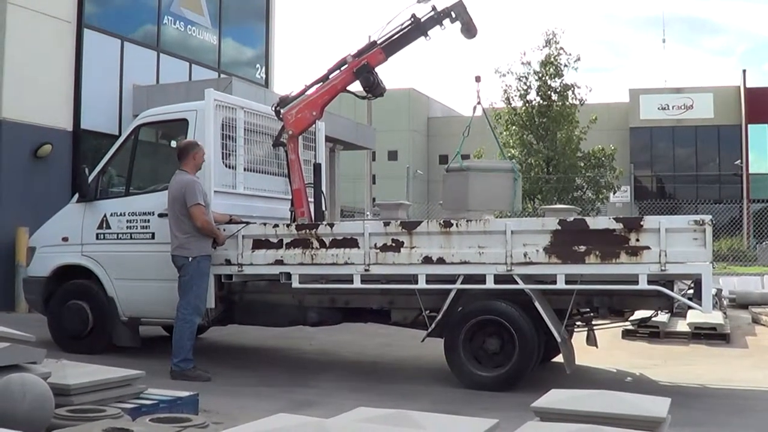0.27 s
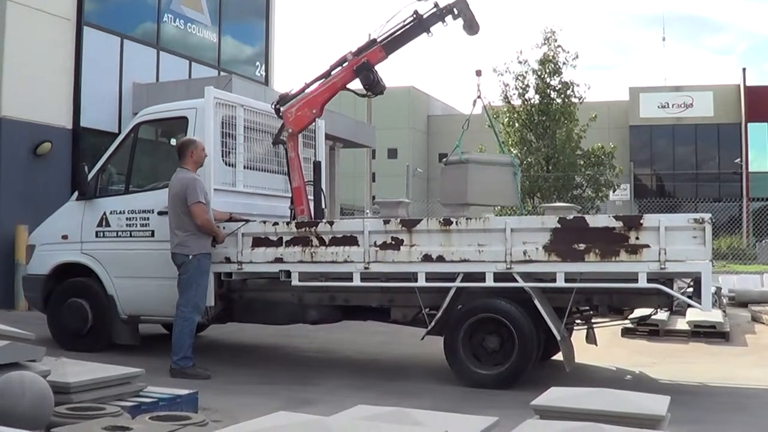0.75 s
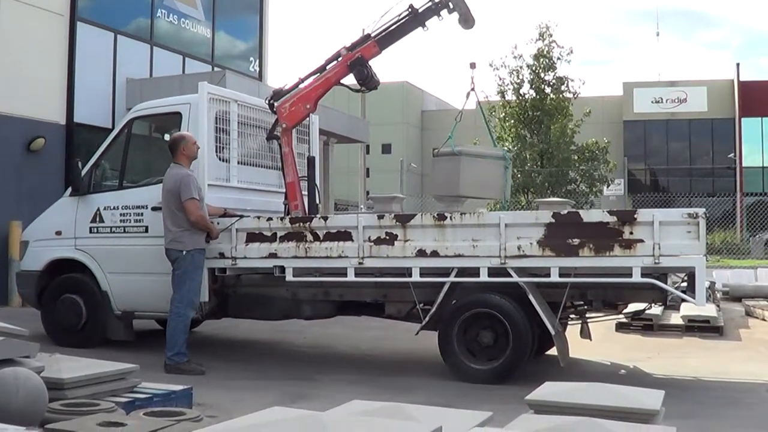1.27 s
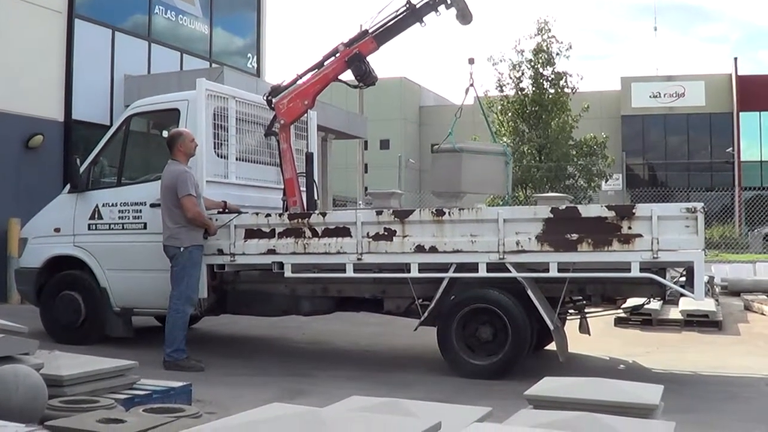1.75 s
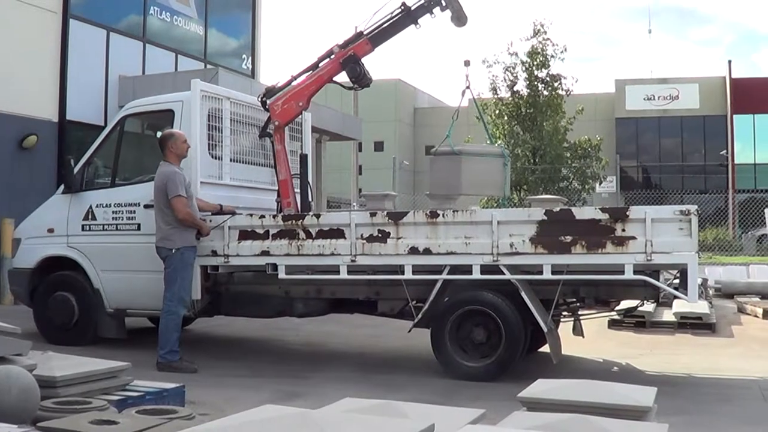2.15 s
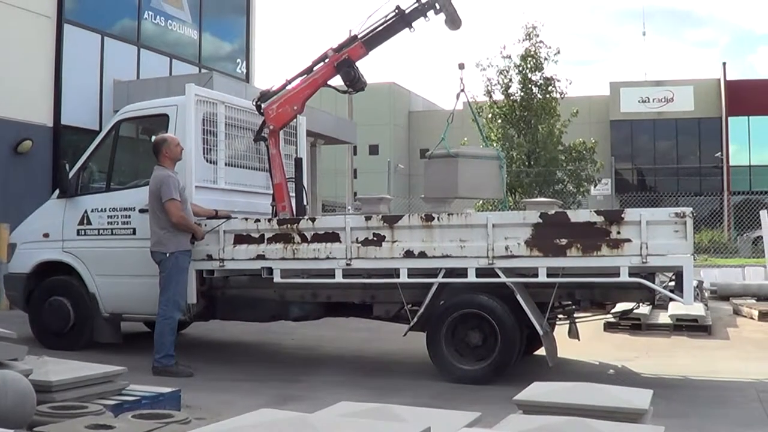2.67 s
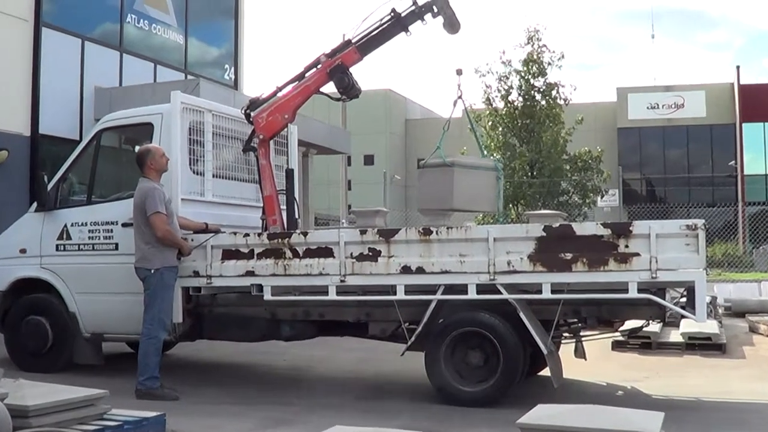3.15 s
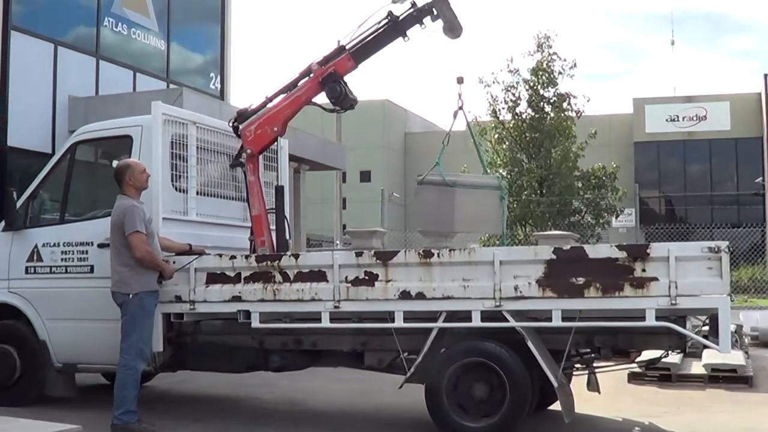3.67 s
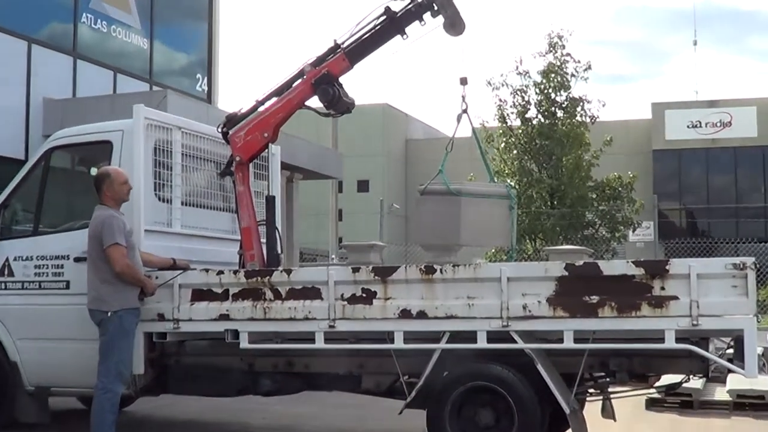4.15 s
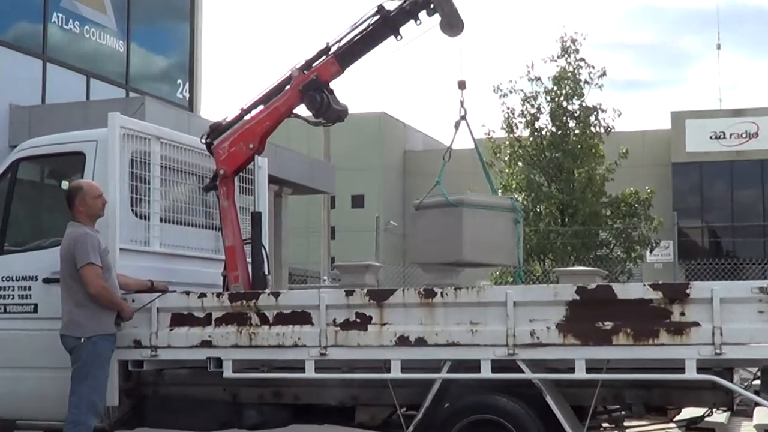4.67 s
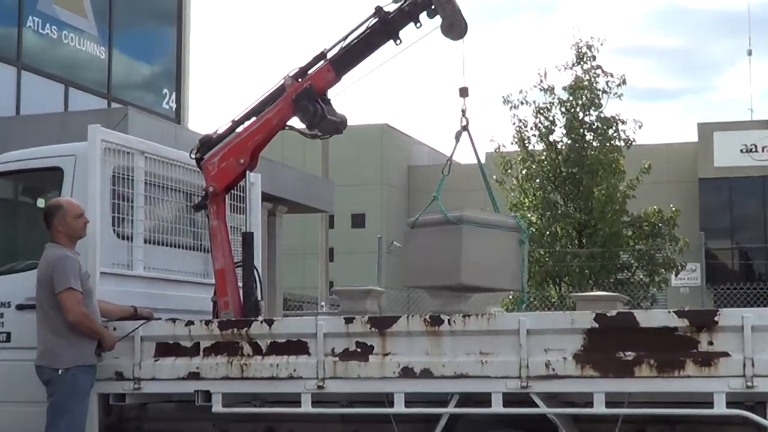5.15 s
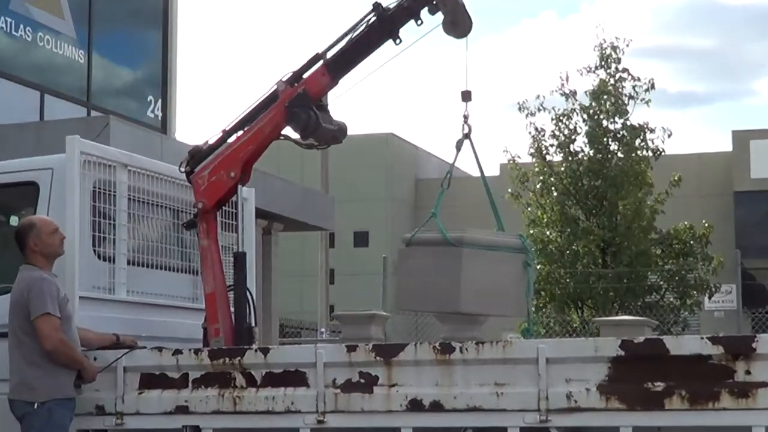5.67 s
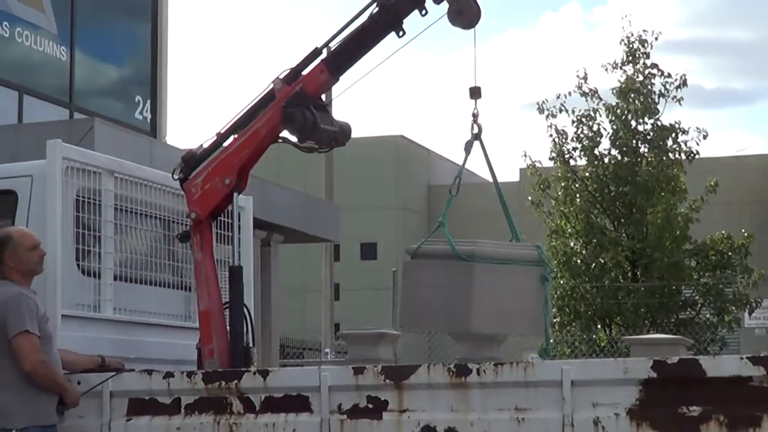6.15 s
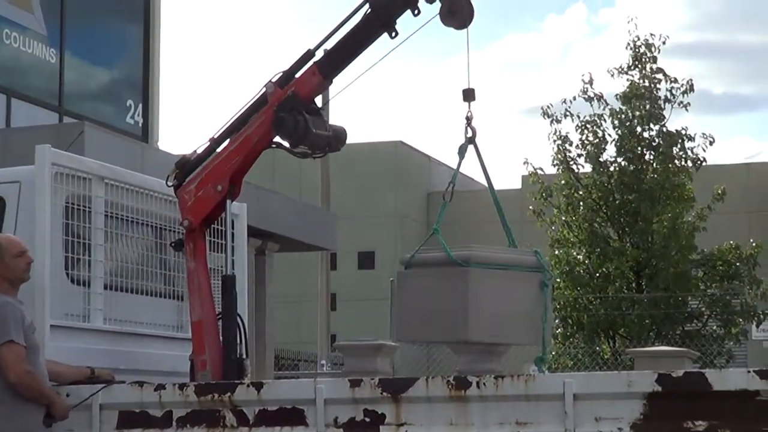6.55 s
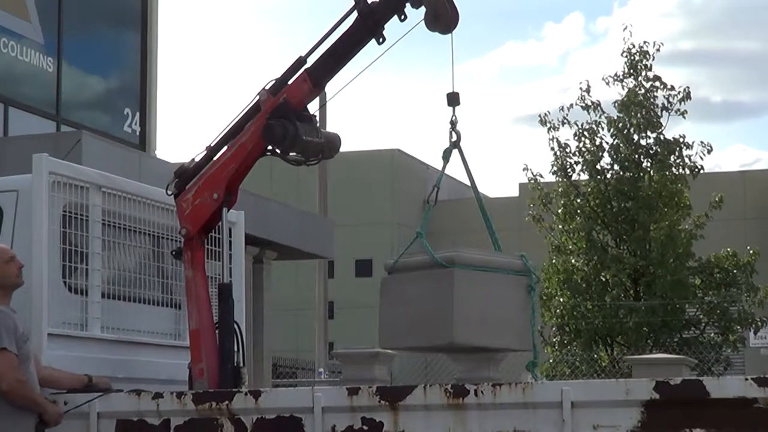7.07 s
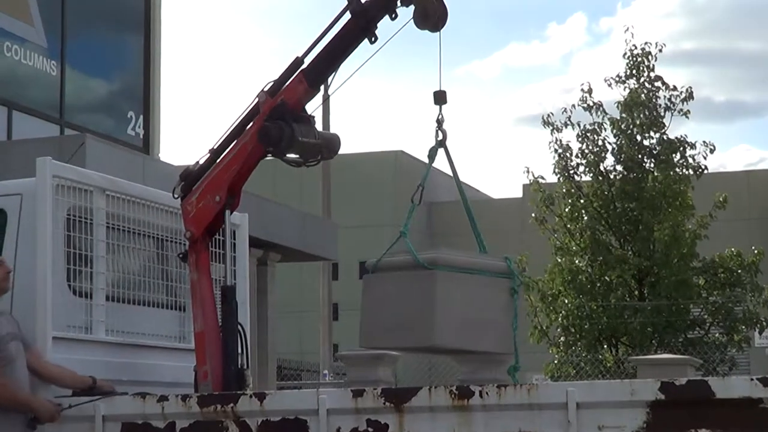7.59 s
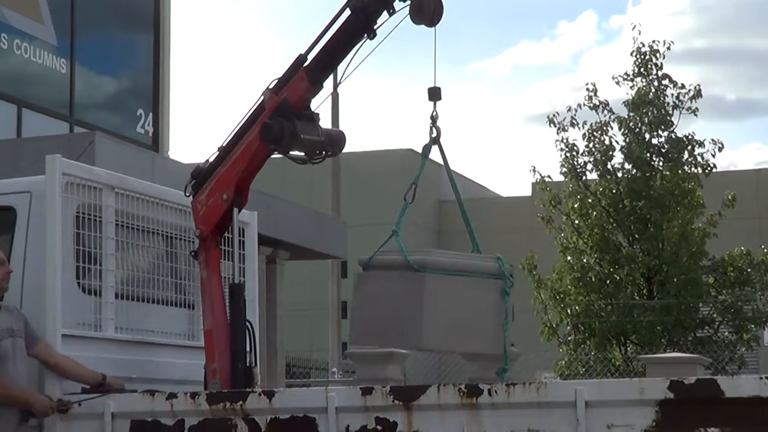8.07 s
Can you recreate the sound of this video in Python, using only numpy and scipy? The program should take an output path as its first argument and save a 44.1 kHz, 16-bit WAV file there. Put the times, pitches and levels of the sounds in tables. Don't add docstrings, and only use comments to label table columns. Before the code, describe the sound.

A few metres away in an open yard, a small truck crane's electric motor and gear pump whine steadily with a buzzy rasp. Wind thumps the camera's stereo microphones. About 1.6 seconds in, a metallic click cuts the motor and it coasts down; another clack restarts it, racing high. From three seconds it drops in pitch and settles into a stronger, rougher whine with rushing oil and humming hoses as the wind eases.

```python
import sys
import numpy as np
from scipy import signal
from scipy.fft import rfft, irfft, next_fast_len
from scipy.io import wavfile
from scipy.ndimage import uniform_filter1d

SR = 44100
rng = np.random.default_rng(int(sys.argv[2]) if len(sys.argv) > 2 else 0)


def transcribe(u):
    v = np.clip(np.atleast_2d(u).T, -1, 1)
    q = np.round(v * 32767).astype(np.int16)
    wavfile.write(sys.argv[1], SR, q)


def volts_from_decibels(level):
    exponent = np.asarray(level, float) / 20
    return 10 ** exponent


N = 366912

# (frequency [Hz], level [dB])
SCAN_LINES = [(15525, -80), (15574, -87), (15622, -72), (15676, -82), (15725, -82)]
# (frequency [Hz], time to fall 60 dB [s])
ECHO_TIMES = [(400, 1), (2000, 0.64), (8000, 0.04), (15000, 0.093)]
# (frequency [Hz], likeness [-1..1])
PORT_LIKENESS = [(60, 0.89), (130, 0.71), (290, 0.35), (640, -0.57), (1400, -0.33)]
# (frequency [Hz], likeness [0-1])
YARD_LIKENESS = [(300, 0.99), (1000, 1), (3000, 0.83), (7000, 0.67), (10000, 0.78)]
# (time [s], half length [s], strength [dB], brightness [dB])
GUST_EVENTS = [(0.198, 0.027, -30, -3), (0.333, 0.055, -43, -8), (0.45, 0.017, -31, -1),
               (6.523, 0.021, -37.5, -5), (0.67, 0.058, -29, -2.5), (0.764, 0.033, -24, 7.5),
               (0.923, 0.073, -45.5, -9.5), (1.27, 0.046, -44, -7.5), (1.517, 0.015, -22, 3),
               (1.628, 0.1, -28, -3.5), (1.755, 0.05, -20, 6.5), (1.846, 0.085, -25.5, -0.5),
               (1.982, 0.024, -28, 5), (2.198, 0.011, -24.5, 6), (2.105, 0.035, -26, 10.5),
               (2.237, 0.15, -27.5, -2), (2.378, 0.12, -24.5, 6), (2.542, 0.078, -34.5, 4),
               (2.88, 0.085, -38.5, 3), (3.07, .06, -39.5, 0.5), (4.108, 0.14, -46.5, -5),
               (4.293, 0.026, -35.5, -7), (4.7, 0.81, -57, 10), (5.482, 0.17, -34.5, 4.5),
               (5.966, 0.14, -39.5, 2), (6.249, 0.041, -39, 1.5), (6.757, 0.069, -27, 4),
               (6.854, 0.039, -35, 12.5), (7.438, 0.015, -39, 1), (8.251, 0.11, -36, -1.5)]
# (time [s], peak level [dB], frequency [Hz])
EDDIES = [(0.166, -16.5, 170), (0.547, -24, 148), (0.741, -15, 160), (1.125, -22, 169), (1.344, -18.5, 101),
          (1.433, -17, 190), (1.509, -15, 161), (1.92, -9.5, 143), (1.967, -14, 129.7), (2.054, -15.5, 140),
          (2.748, -29.5, 117), (3.017, -23, 113.1), (3.421, -33, 128), (4.033, -25.5, 150.4),
          (4.16, -23, 114.7), (4.973, -25, 82.8), (5.213, -23, 108.1), (5.408, -20.5, 144.6),
          (5.871, -26, 128.9), (5.96, -16.5, 119), (6.42, -22.5, 179.1), (6.661, -20.5, 224),
          (6.939, -17.5, 140), (7.027, -21, 104.2), (7.121, -22.5, 159), (7.436, -21.5, 153),
          (7.834, -28, 89), (8.133, -26.5, 175.5), (8.187, -36, 128.3)]
# (frequency [Hz], level per Hz [dB])
THUMP_SPECTRUM = [(15, -8), (30, -23), (60, -1.5), (140, 2), (200, -4.5), (280, -26.5), (500, -63)]
# (frequency [Hz], level per Hz [dB])
FLUTTER_SPECTRUM = [(100, 0.5), (190, 1), (250, 1.5), (400, -5.5), (550, -17.5), (900, -68.5)]
# (frequency [Hz], level per Hz [dB])
RIP_SPECTRUM = [(300, -13), (550, -4.5), (1000, -13.5), (2000, -27.5), (3000, -41.5), (5000, -51)]
# (time [s], half length [s], frequency [Hz], width [Hz], level
# [dB])
HISS_EVENTS = [(.38, 0.25, 3200, 350, -57.5), (1.213, 0.25, 9100, 1500, -55), (1.932, 0.0041, 1100, 1800, -41),
               (1.982, 0.003, 1100, 1800, -37), (3.07, 0.044, 1520, 1583, -48.5), (3.37, .06, 2200, 250, -49),
               (5.726, .04, 2410, 250, -51), (2.752, 0.27, 534, 39.7, -58), (6.252, 0.0022, 6000, 9000, -38.5),
               (8.133, 0.021, 8500, 5015, -49), (8.182, 0.012, 8900, 7980, -42),
               (8.204, 0.012, 7000, 7950, -41.5)]
# (time [s], peak level [dB], body level [dB])
CONTACTOR = [
    (1.565, -15, -16),
    (2.0317, -18, 0.5),
]
# (frequency [Hz], level [dB], time to fall 60 dB [s])
CONTACTOR_MODES = [(8180, 4, 0.078), (8530, -9, 0.068), (7000, -3, 0.049), (4200, -0.5, 0.028),
                   (4570, -3, 0.025), (5700, -4, .03), (10190, -9, 0.05), (13400, -14, .04)]
# (time [s], half length [s], level [dB])
HOSE_HUMS = [(4.722, 0.33, -44), (5.846, 0.22, -43), (6.918, .25, -42.5), (8.3, 0.3, -45.5)]
# (frequency [Hz], level per Hz [dB])
RASP_SPECTRUM = [(300, 6.5), (1000, -15), (2700, -11.5), (3300, -7), (4500, -8.5), (6000, -11), (7100, -6),
                 (9500, -14.5), (11500, -12.5), (13000, -12), (14600, -15), (15700, -17)]
# (frequency [Hz], level per Hz [dB])
FLOW_SPECTRUM = [(250, -13), (600, -7), (1000, -20), (1250, -8), (1450, -15.5), (1760, -2.5), (2000, -9),
                 (2400, -21.5), (3000, -30.5), (5000, -53)]
# (time [s], motor effort [dB], valve flow [dB])
EFFORT = [(0.0, -56.5, -73), (0.3, -56.5, -82), (1.15, -56, -75), (1.55, -58, -91), (1.81, -60.5, -90),
          (2.06, -58.5, -90), (2.32, -56, -87), (2.55, -56, -82), (3.01, -53, -79), (3.17, -53, -60),
          (3.78, -54, -59.5), (5.08, -52, -56.5), (5.42, -49, -57.5), (5.98, -51, -55), (6.53, -50.5, -55),
          (7.14, -48.5, -54), (7.62, -48.5, -56), (8.32, -48, -53)]
# (time [s], tooth rate [Hz], whine level [dB])
LOADED_PUMP = [(0.0, 596, -42.5), (1.0, 602.6, -50.5), (1.15, 616, -43.5), (1.39, 634, -43.5),
               (1.55, 779.4, -49), (2.95, 846, -46), (3.1, 725, -44.5), (3.21, 671.3, -39),
               (3.31, 541, -43), (3.45, 549.5, -37), (4.15, 565.7, -41.5), (4.55, 584.5, -40),
               (5.4, 597.5, -35.5), (5.8, 585.4, -40), (6.15, 578, -34.5), (7.1, 589.6, -36),
               (7.75, 599.7, -37), (8.32, 582.8, -33)]
# (multiple of the tooth rate, level [dB])
LOADED_OVERTONES = [(1, 0), (2, 0), (3, -14), (4, -9.5), (5, -24), (6, -15.5), (7, -20), (8, -21.5),
                    (9, -32.5), (10, -23), (11, -21.5), (12, -22), (13, -37.5), (14, -20.5), (15, -28),
                    (16, -20.5), (17, -26.5), (18, -22.5), (19, -32), (20, -25), (21, -35.5), (22, -22.5),
                    (23, -34), (24, -20.5), (25, -39), (26, -20)]
# (multiple of the tooth rate, level [dB])
FREE_OVERTONES = [(1, 0), (2, -9), (3, -13), (4, -18), (5, -14), (6, -23), (7, -15), (8, -13), (9, -18.5),
                  (10, -20), (11, -13.5), (12, -16), (13, -18), (14, -20), (15, -22), (16, -15), (17, -24),
                  (18, -13)]
# (shaft order [per turn], level [dB])
SHAFT_ORDERS = [(27.13, 1.3), (54.1, -13), (83, -60), (11.84, -17), (31.1, -15), (25, -6.5)]
# (frequency [Hz], width [Hz], level [dB])
FRAME_MODES = [(7120, 300, 5), (13000, 470, 3), (8315, 59, -1.5)]
# (frequency [Hz], width [Hz], level [dB])
PANEL_MODES = [(703, 5, 15), (808, 6, 11), (760, 7, 3)]
CASING_RATES = [548, 577, 584, 590, 597, 604, 720, 850]
CASING_LEVELS = [
    (-0.5, 0, 0.3, 0.6, -1.5, 0, 0, 0),
    (-2, 4, 4, 5, 6, 3, -1, 0),
    (-8.5, 5.5, -2.5, -4, -1, -8, -8, -8.5),
    (-8, -7.5, -7.5, -4.5, -8, -5, -12, -14),
]

TEETH, STRONG = 13, (1, 2, 4, 6)
TOP_HZ, MONO_HZ = 15780, 10100


def unit(x):
    return x / np.sqrt(np.mean(x ** 2) + 1e-20)


def along(points, hz):
    f, v = np.transpose(points)
    return np.interp(np.log(hz + 1), np.log(f + 1), v)


def curves(rows):
    s, *cols = np.transpose(rows)
    return [np.interp(np.arange(N) / SR, s, c) for c in cols]


def wobble(rate, size=1):
    return np.interp(np.arange(0, N, size) * rate / SR, np.arange(4000), rng.standard_normal(4000))


def filtered(x, response):
    m = next_fast_len(N + SR // 2)
    return irfft(rfft(x, m) * response(np.fft.rfftfreq(m, 1 / SR)), m)[..., :N]


def coloured_noise(spectrum, alike):
    def mid_side(hz):
        turn = np.arccos(np.clip(along(alike, hz), -1, 1)) / 2
        return volts_from_decibels(along(spectrum, hz)) * [np.cos(turn), np.sin(turn)]

    mid, side = filtered(rng.standard_normal((2, N)), mid_side)
    return unit(np.array([mid + side, mid - side]))


def swells(s, half, db, floor_db, order=2):
    t = np.arange(0, N, 50) / SR
    bells = np.exp(-2 * ((t - s[:, None]) / half[:, None]) ** order)
    power = volts_from_decibels(2 * db) @ bells + volts_from_decibels(2 * floor_db)
    return np.interp(np.arange(N) / SR, t, np.sqrt(power))


def scan_line_tone():
    t, tone = np.arange(N) / SR, np.zeros(N)
    for hz, db in SCAN_LINES:
        tone += volts_from_decibels(db + 3 + 0.8 * wobble(20)) * np.sin(2 * np.pi * hz * t + 0.3 * wobble(12))
    return tone


def echoes(x):
    hz, t, z = signal.stft(rng.standard_normal((2, SR // 2)), SR, nperseg=256)
    decay = volts_from_decibels(-60 * t / along(ECHO_TIMES, hz)[:, None])
    mid, side = signal.istft(z * decay, SR, nperseg=256)[1]
    tail = np.array([mid + 0.49 * side, mid - 0.11 * side]) / np.linalg.norm(mid)
    return signal.fftconvolve(x[None], tail, axes=1)[:, :N]


def eddies():
    out, t = np.zeros((2, N)), np.arange(-900, 900) / SR
    for s, db, hz in EDDIES:
        skew = rng.normal(0, 0.48) * np.array([[1], [-1]])
        eddy = np.exp(-(t * hz / 0.85) ** 2) * np.cos(2 * np.pi * hz * t + skew)
        eddy = eddy + 0.3 * np.exp(-(t * hz / 0.08) ** 2)
        at = round((s + 0.00857) * SR)
        out[:, at - 900:at + 900] += volts_from_decibels(db - 1.5) * eddy[:, :N - at + 900]
    return out


def wind():
    dragged = [(s + 0.016, 0.013, db - 12, 0) for s, db, _ in EDDIES]
    s, half, db, bright_db = np.transpose(GUST_EVENTS + dragged)
    thump_gain = swells(s, 1.11 * half, 0.58 * db - 14 - 1.03 * bright_db, -43.5)
    flutter_gain = volts_from_decibels(3.5) * swells(s, half, db, -53.5)
    rip_gain = volts_from_decibels(15.5) * swells(s, 0.99 * half, 1.03 * db - 25 + 0.9 * bright_db, -69.5)
    shared = wobble(30)

    def lumps(depth_db, rate):
        own = np.array([wobble(rate), wobble(rate)])
        return volts_from_decibels(depth_db * (0.63 * shared + own))

    thump = thump_gain * unit(lumps(2.85, 30) * coloured_noise(THUMP_SPECTRUM, PORT_LIKENESS))
    flutter = flutter_gain * unit(lumps(2.5, 45) * coloured_noise(FLUTTER_SPECTRUM, PORT_LIKENESS))
    rip = rip_gain * unit(lumps(4.6, 150) * coloured_noise(RIP_SPECTRUM, PORT_LIKENESS))
    return thump + flutter + rip + eddies()


def hisses():
    t, out = np.arange(N) / SR, np.zeros(N)
    for s, half, hz, width, db in HISS_EVENTS:
        band = filtered(rng.standard_normal(N), lambda f: np.exp(-((f - hz) / width * 2) ** 2))
        out += volts_from_decibels(db) * np.exp(-((t - s) / half) ** 2) * unit(band)
    return out


def contactor():
    out, t = np.zeros((2, N)), np.arange(SR // 5) / SR
    for s, db, body_db in CONTACTOR:
        modes = np.zeros(len(t))
        for hz, level, t60 in CONTACTOR_MODES:
            mode_db = level + (hz < 5000) * (body_db + 9)
            modes += volts_from_decibels(mode_db - 60 * t / t60) * np.sin(2 * np.pi * hz * t)
        bounce = 0.9 * volts_from_decibels(-60 * t / 0.086) + 1.4 * np.exp(-((t - 0.0025) / 0.0009) ** 2)
        white = rng.standard_normal(len(t) + 1)
        chatter = (0.26 * np.diff(white) + 0.99 * volts_from_decibels(body_db) * white[1:]) * bounce
        rise = np.clip(t / 0.0045, 0, 1)
        stroke = volts_from_decibels(db - 17) * rise * (modes + chatter) * volts_from_decibels([[1.5], [-1.5]])
        out[:, round((s - 0.002) * SR):][:, :len(t)] += stroke
    return out


def shaft_turns():
    coast_hz, coast_s, free_hz, spin_up_s = 396.5, 0.2, 858, 0.16
    t, loaded = np.arange(N) / SR, curves(LOADED_PUMP)[0]
    off, on = np.transpose(CONTACTOR)[0]
    gentle = uniform_filter1d(loaded, size=14000, mode="nearest")
    loaded = np.where(t > 3.5, gentle, loaded)
    coast = coast_hz + (loaded[round(off * SR)] - coast_hz) * np.exp((off - t) / coast_s)
    run_up = free_hz + (coast[round(on * SR)] - free_hz) * np.exp(np.minimum(on - t, 0) / spin_up_s)
    meets_oil = t > LOADED_PUMP[5][0]
    stages = [t < off, t < on, meets_oil]
    tooth_hz = np.select(stages, [loaded, coast, np.minimum(loaded, run_up)], run_up)
    tooth_hz = uniform_filter1d(tooth_hz, size=2000) * (1 + 0.000751 * wobble(25))
    return 2 * np.pi * np.cumsum(tooth_hz / TEETH) / SR, tooth_hz


def motor_noise(shaft):
    rasp_db, flow_db = curves(EFFORT)
    beat = 1 + 0.24 * np.cos(TEETH * shaft) + 0.078 * np.cos(shaft)
    rasp = volts_from_decibels(rasp_db + 5.5 + 0.3 * wobble(11)) * beat * coloured_noise(RASP_SPECTRUM, YARD_LIKENESS)
    flow = volts_from_decibels(flow_db + 12.5 + 2.2 * wobble(35)) * beat * coloured_noise(FLOW_SPECTRUM, YARD_LIKENESS)
    hum_gain = swells(*np.transpose(HOSE_HUMS), floor_db=-59, order=4) * volts_from_decibels(4 * wobble(45))
    hum = hum_gain * np.sin(2 * np.pi * 370 * np.arange(N) / SR + 0.6 * wobble(21))
    return rasp + flow + hum


def steel_response(f):
    response = 1
    for centre, width, db in FRAME_MODES + PANEL_MODES:
        response = response + volts_from_decibels(db) * 1j * f * width / (centre ** 2 - f ** 2 + 1j * f * width)
    return response


def whine(shaft, tooth_hz):
    rasp_db, t = curves(EFFORT)[0], np.arange(N) / SR
    drive_db = [curves(LOADED_PUMP)[1], rasp_db, rasp_db, rasp_db]
    strong_db = []
    for drive, levels in zip(drive_db, CASING_LEVELS):
        strong_db.append(drive + np.interp(tooth_hz, CASING_RATES, levels) + 0.7 * wobble(6))

    slope = uniform_filter1d(np.gradient(np.log(tooth_hz)), size=4000) * SR
    slope = np.clip(slope / 1.2, -1, 1)
    glide, speeding = np.abs(slope), np.maximum(slope, 0)
    stall_db = 4

    def broken_db(size):
        return glide[::size] * 9.5 * (wobble(45, size) - 0.5)

    coasting_db = np.interp(t, [CONTACTOR[0][0], 1.75, CONTACTOR[1][0], 2.2], [-3.5, 5, 16, -0.5])
    free = np.clip((tooth_hz - 640) / 120, 0, 1)

    coarse = 32
    slow = slice(0, N, coarse)
    high, tooth, partial = np.zeros(N), np.exp(1j * TEETH * shaft), 1
    for k, loaded_db in LOADED_OVERTONES:
        partial = partial * tooth
        if k in STRONG:
            continue
        free_db = along(FREE_OVERTONES, k) - 4.5
        db = loaded_db + free[slow] * (free_db - loaded_db)
        db = db + 0.15 * k * wobble(9, coarse) + broken_db(coarse)
        start, a, b = rng.uniform(0, 2 * np.pi, size=3)
        turns = np.cos(shaft[slow] + a) + 0.45 * np.cos(2 * shaft[slow] + b)
        throb = 1 + 0.5 * min(1, (k - 1) / 4) * turns
        gain = volts_from_decibels(db) * (k * tooth_hz[slow] < TOP_HZ) * throb
        high += np.interp(t, t[slow], gain) * (partial * np.exp(1j * start)).imag
    high *= volts_from_decibels(rasp_db + 13 - 0.76 * coasting_db - stall_db * speeding)

    low = np.zeros(N)
    for k, db in zip(STRONG, strong_db):
        low += volts_from_decibels(db + 3 - coasting_db + broken_db(1)) * np.sin(k * TEETH * shaft)
    for order, db in SHAFT_ORDERS:
        base_db = strong_db[0] if order < TEETH else uniform_filter1d(strong_db[1], size=12000)
        order_db = base_db + db - 12 * free - stall_db * glide + 0.23 * wobble(9.4)
        low += volts_from_decibels(order_db) * np.sin(order * shaft + order)

    low, high = filtered(np.array([low, high]), steel_response)
    return low + volts_from_decibels(-3) * high + echoes(volts_from_decibels(-17) * low + volts_from_decibels(-4) * high)


def scene():
    shaft, tooth_hz = shaft_turns()
    return wind() + hisses() + contactor() + motor_noise(shaft) + whine(shaft, tooth_hz)


def top_cut(x):
    return signal.sosfilt(signal.butter(12, 15850, fs=SR, output="sos"), x)


def record(dry):
    mid = filtered(dry.mean(axis=0) + scan_line_tone(), lambda hz: hz < TOP_HZ)
    side = filtered((dry[0] - dry[1]) / 2, lambda hz: np.where(hz < MONO_HZ, 1, volts_from_decibels(-14)))
    return top_cut(np.array([mid + side, mid - side]))


dry = scene()
out = record(dry)
transcribe(out)
```